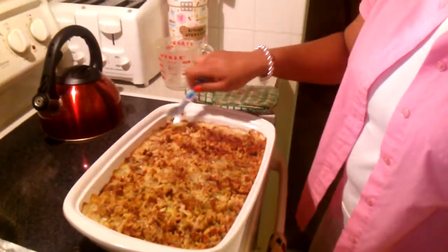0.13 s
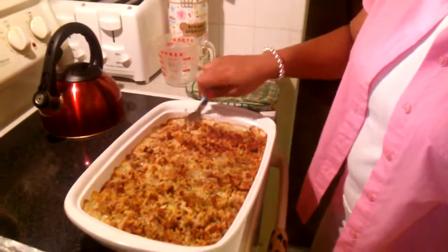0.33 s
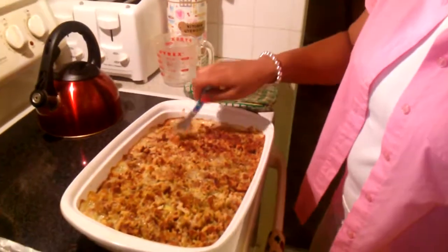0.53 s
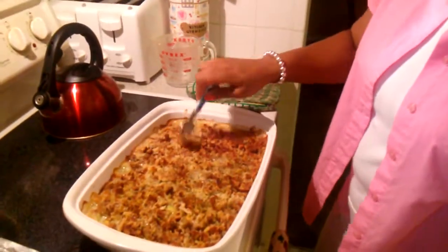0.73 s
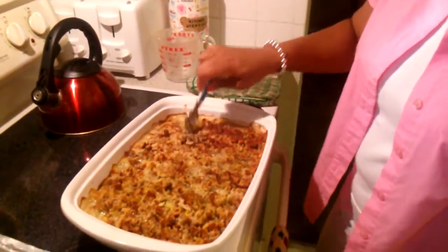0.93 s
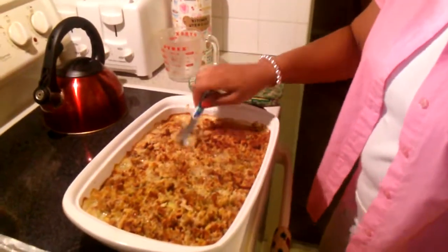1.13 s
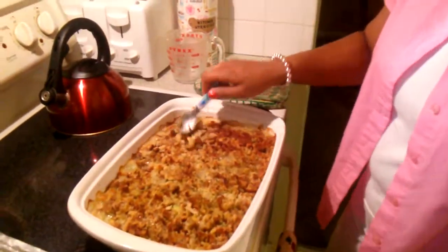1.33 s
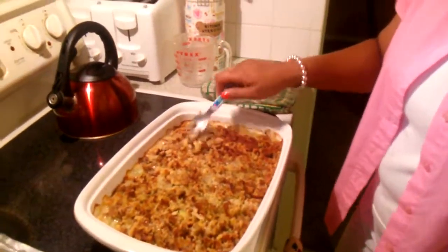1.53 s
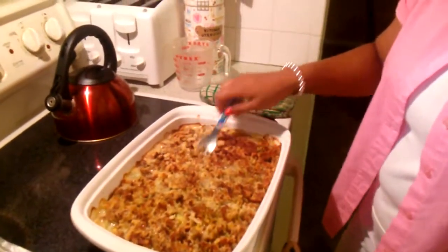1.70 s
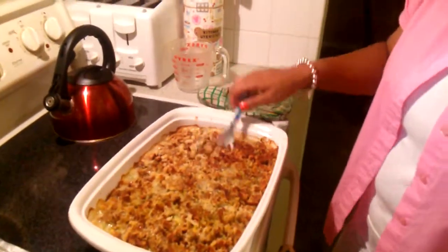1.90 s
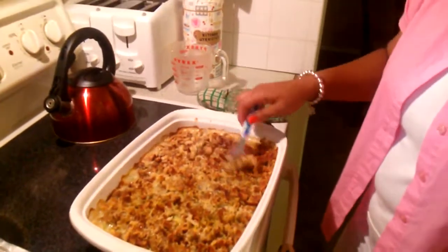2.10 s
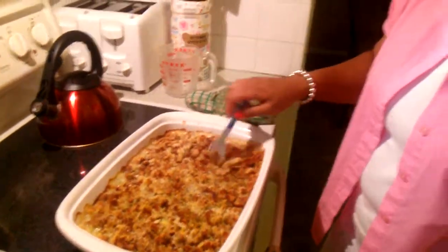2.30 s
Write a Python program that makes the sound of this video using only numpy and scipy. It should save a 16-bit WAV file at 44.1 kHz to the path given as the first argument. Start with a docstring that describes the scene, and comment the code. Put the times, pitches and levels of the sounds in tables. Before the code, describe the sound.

Spoon digging into a crisp baked casserole, one bright dish clink, then crackling scrapes and dull knocks

```python
"""The crisp crust of a hot casserole crackles and snaps under a metal spoon: spectrally shaped random impulses.
The spoon clinks once on the rim of a ceramic dish, a sum of beating modes, then drags as coarse grains;
its dull knocks excite damped resonances, and it squeaks once as a rising tone. Feedback delays give the echo.
Filtered noise makes the room tone, hiss and low rumble; sinusoids make a sagging bump, mains hum and a high whine."""
import sys
import numpy as np
from scipy import signal
from scipy.fft import rfft, irfft, next_fast_len
from scipy.io import wavfile

SR = 44100
rng = np.random.default_rng(int(sys.argv[2]) if len(sys.argv) > 2 else 0)


def transcribe(u):
    """Save the signal u as a 16-bit wav file named by the first command-line argument.

    u: samples, shape (n,) or (channels, n), limited to [-1, 1]; the rate is SR.
    q: integer samples, one column per channel.
    """
    v = np.clip(np.atleast_2d(u).T, -1, 1)
    q = np.round(v * 32767).astype(np.int16)
    wavfile.write(sys.argv[1], SR, q)


N = 103635
T = np.arange(N) / SR   # t/s

# Room tone spectrum, before scaling to unit rms: f/Hz, level per Hz/dB
AIR_SPECTRUM = [(29, -45), (50, -7), (81, -7), (130, -7.5), (162, -0.5), (238, -1.5), (477, -21),
                (628, -11), (688, -17.5), (1660, -27.5), (4000, -29.5), (5200, -51), (8800, -120)]
# Room tone envelope, before the trim: t/s, level/dB
AIR_ENVELOPE = [(0.0, -46), (0.03, -43.5), (0.12, -49.5), (0.2, -43.5), (0.28, -51), (0.38, -45.5),
                (0.46, -46.5), (0.79, -45), (0.83, -41), (0.93, -49), (1.03, -45), (1.28, -49), (1.31, -42),
                (1.37, -47), (1.41, -38.5), (1.58, -47), (1.77, -45.5), (1.8, -50), (1.9, -46.5),
                (1.96, -49), (2.01, -48.5), (2.11, -54.5), (2.13, -49), (2.35, -52)]
AIR_TRIM_DB = -1.5
HISS_DB, HISS_FROM_HZ = -52.5, 4600
# Mains hum partials, before the lift and the swell: f/Hz, level/dB
HUM_PARTIALS = [(120, -53.5), (240, -60.5)]
HUM_LIFT_DB = 3.5
# Whine envelope about which the level throbs: t/s, level/dB
WHINE_ENVELOPE = [(0, -49), (1.25, -49), (1.35, -57), (1.9, -56), (2.1, -61), (2.26, -50), (2.35, -53)]
WHINE_HZ, WHINE_WAVER_DB, WHINE_WAVER_HZ = 15737, 5, 11.6

# Rumble envelope: t/s, level/dB
RUMBLE_ENVELOPE = [(0.0, -54), (0.03, -30), (0.2, -29), (0.27, -48), (0.44, -34.5), (0.5, -55), (0.56, -44),
                   (0.69, -44), (0.76, -30), (0.8, -31), (1.2, -38.5), (1.42, -34.5), (1.45, -42),
                   (1.48, -39), (1.58, -55), (1.62, -33.5), (1.77, -34.5), (2.15, -55), (2.2, -42.5),
                   (2.35, -54)]
RUMBLE_BAND_HZ = (14.1, 46.3)
# A bump through the counter
THUMP_S, THUMP_DB, THUMP_T60_S = .737, -13, .55
THUMP_START_HZ, THUMP_SAG_HZ_PER_S = 37, 30

ROOM_T60_S, ROOM_DB, WALL_CUT_HZ = 0.52, -18.5, 3700

# Spoon dragging in the food, by stretch: t/s, low level/dB, upper level/dB
DRAG_ENVELOPES = [
    [(0.0, -57, -46), (0.008, -63, -48), (0.014, -58, -47.5), (0.064, -71, -55), (0.072, -54, -55.5),
     (0.112, -67, -60), (0.116, -58, -62), (0.128, -66, -57), (0.138, -57, -60), (0.146, -65, -62),
     (0.176, -75, -68), (0.186, -54, -79), (0.2, -46, -53)],
    [(0.42, -58.5, -42.5), (0.428, -47.5, -43), (0.466, -54.5, -49), (0.608, -51.5, -61), (0.652, -47, -47),
     (0.692, -64, -48.5), (0.734, -49.5, -66), (0.752, -68, -68), (0.768, -61, -58), (0.86, -53.5, -44.5),
     (0.92, -71, -53), (1.042, -43, -50), (1.154, -39, -46.5), (1.29, -55, -53.5)],
    [(1.46, -49, -44), (1.496, -61.5, -53), (1.54, -62.5, -44.5), (1.648, -58, -55), (1.672, -53, -59.5),
     (1.696, -60, -51.5), (1.798, -49.5, -50), (1.846, -54, -57.5), (1.988, -56.5, -65),
     (2.012, -44.5, -68), (2.084, -58.5, -61), (2.128, -57, -78), (2.254, -54.5, -52.5), (2.35, -63, -71)],
]
# Low drag spectrum, before scaling to unit rms: f/Hz, level per Hz/dB
DRAG_LOW_SPECTRUM = [(120, -61), (200, -22), (393, 8), (606, -4.5), (680, 3), (763, -2), (1080, -3.5),
                     (1210, -6.5), (2000, -26), (2600, -72), (4400, -120)]
# Upper drag spectrum, before scaling to unit rms: f/Hz, level per Hz/dB
DRAG_UPPER_SPECTRUM = [(1100, -4), (1400, 0), (2200, -1), (3200, 3), (4500, -0.5), (6000, -25)]

# The spoon edge slips
SQUEAK_S, SQUEAK_LENGTH_S, SQUEAK_DB = 1.495, .065, -45
SQUEAK_START_HZ, SQUEAK_RISE_HZ = 3250, 180

# Spoon on the dish under the food:
# t/s, drive level/dB, added high-band level/dB, added low-band level/dB, t60/s
KNOCK_EVENTS = [(1.141, -35, 3, -6, 0.16), (1.302, -17.5, 0.5, -9, 0.19), (1.386, -20, -3.5, 3, 0.1),
                (1.396, -23, -1, 5, 0.12), (1.42, -29.5, -7.5, 12, 0.17), (1.666, -43, -25, -12, .1),
                (1.753, -27.5, -15, -8.5, 0.079), (1.798, -22, -17.5, -15, 0.1),
                (1.866, -29.5, -28, 1, 0.13), (2.006, -27, -13, -13, 0.11)]
# Damped resonances of the full dish: f/Hz, bandwidth/Hz, level/dB
FULL_DISH_MODES = [(131, 95, -2), (209, 115, -1), (324, 55, 0), (414, 69, 2.5), (718, 96, 2.5),
                   (860, 94, -3), (1150, 150, -4), (1350, 155, 2), (1890, 600, -2), (2250, 150, -4.5),
                   (2460, 110, -8.5), (3260, 110, -4.5), (3750, 180, -7), (5300, 1450, -12),
                   (8240, 3500, -16.5)]
KNOCK_DB, KNOCK_SPLIT_HZ = -0.5, (280, 550)

# Spoon on the rim: t/s, gain of the whole clink/dB
CLINK_EVENT = [(0.2239, 1)]
# Beating mode pairs, before the common gain:
# f/Hz, level/dB, t60/s, frequency split/Hz, relative amplitude of the twin (minus = opposed phase)
DISH_MODES = [(790, -11, .15, 30, .5), (1200, -13, .15, 40, .5), (1868, -13, 1.0, 11, .5),
              (2622, -10, .8, 14, -.8), (3460, -5, .9, 9.5, .5), (4208, -2, .35, 6, .5),
              (4468, -8, .7, 44, .8), (5774, -10, .3, 12, .5), (6099, -11, .5, 10, .4),
              (6200, -14, .9, 9, .4), (6438, -14, .4, 15, -.5), (6594, -13, .35, 12, .4),
              (6992, -12, .4, 33, .8), (7085, -12, .5, 12, .5), (8110, -14, .4, 15, .5),
              (9128, -10, .3, 25, .6), (9600, -12, .3, 80, .8), (11095, -18, .35, 12, .4)]
DISH_DB, RING_ROUGH_DB, STRIKE_RISE_S = -18.5, 3.5, .0012
DAMP_S, DAMP_DB_PER_S = 0.36, 246   # the ringing is choked from here on
# Dense small modes of the spoon, before gain or scaling: f/Hz, level/dB
SHIMMER_SPECTRUM = [(500, 7), (800, -25), (2000, -25), (3300, -14), (4400, -9), (5200, -5.5), (6300, 2.5),
                    (7600, -5), (9300, 5.5), (10500, -7.5), (12500, -19), (16000, -23)]
SHIMMER_DB, SHIMMER_SPREAD_DB, SHIMMER_MEAN_T60_S, SHIMMER_FROM_HZ = -29.5, 3, 0.27, 2000
CRACK_DB, CRACK_T60_S = -5, 0.049
# Rough wash between the modes, before scaling to unit rms: f/Hz, level per Hz/dB
RATTLE_SPECTRUM = [(500, -53), (800, -10), (1300, -10.5), (2200, -14), (3300, -3), (4400, 0), (6300, 1),
                   (7600, -0.5), (9300, -0.5), (10500, -6.5), (13000, -16), (16000, -30)]
RATTLE_DB, RATTLE_T60_S = -19, 0.83

# Crust crackling, by stretch of stirring: t/s, level/dB
CRACKLE_ENVELOPE = [
    [(0.0, -34), (0.044, -29.5), (0.064, -42.5), (0.078, -38), (0.122, -44), (0.132, -44), (0.144, -42.5),
     (0.168, -47), (0.178, -40.5), (0.215, -43.5)],
    [(0.4, -37.5), (0.53, -42), (0.538, -41), (0.548, -34.5), (0.588, -41), (0.696, -35.5), (0.778, -46.5),
     (0.832, -35.5), (0.9, -40.5), (0.932, -37), (0.964, -42.5), (1.018, -39.5), (1.16, -37.5),
     (1.232, -47.5), (1.26, -36.5), (1.29, -47)],
    [(1.29, -44), (1.31, -37), (1.368, -43.5), (1.408, -35), (1.498, -40), (1.622, -41.5), (1.676, -45),
     (1.684, -34), (1.786, -33), (1.88, -42), (1.886, -36), (2.038, -42), (2.042, -48), (2.154, -52),
     (2.18, -37.5), (2.35, -46.5)],
]
# Crackle spectrum, before scaling to unit rms: f/Hz, level per Hz/dB
CRUST_SPECTRUM = [(2000, -23.5), (3600, -27.5), (4200, -11.5), (5000, -7.5), (5700, -7.5), (8100, 0.5),
                  (9300, 0.5), (11200, -9.5), (14000, -13), (15700, -12.5), (15900, -26), (16400, -26)]
MEDIAN_GRAINS_PER_S, GRAIN_SPREAD_DB, CLUMP_DB = 5000, 1.5, 2
# Crumbs breaking: t/s, tick level/dB, then low, middle and high band level/dB before the burst gain
SNAP_EVENTS = [(0.0258, -25, -37, -30, -39), (0.0414, -24, -30, -35, -45), (0.0764, -39, -46, -42, -42),
               (0.1762, -31, -52, -34, -53), (0.18, -39, -59, -38, -45), (0.5477, -29, -41, -37, -40),
               (0.559, -24.5, -33.5, -24, -48), (0.621, -21, -37, -23, -42), (0.6944, -12, -48, -37, -39),
               (0.8292, -27.5, -40, -25, -41), (0.924, -30, -43, -36, -50), (1.0111, -35, -47, -35, -48),
               (1.0338, -27, -45, -26.5, -48), (1.2603, -24, -28.5, -46, -46), (1.6054, -30, -42, -29, -38),
               (1.6113, -22, -29.5, -21.5, -32), (1.6858, -23, -39, -27, -43), (1.69, -31, -41, -29, -40),
               (1.7442, -24, -26, -28, -38), (1.8871, -4, -21, -24, -46), (1.976, -26, -29.5, -37, -44.5),
               (2, -25, -38, -32.5, -27.5), (2.056, -36, -50, -33, -54), (2.1455, -44, -44, -39, -56),
               (2.18, -26, -42, -26, -46)]
# Pass bands of the snaps: lower f/Hz, upper f/Hz
SNAP_BANDS = [(4100, 5200), (6500, 8500), (10500, 14600)]
SNAP_BURST_GAIN_DB, SNAP_BURST_T60_S = 9, .014

CUTOFF_HZ = 15790


def from_db(db):
    """Amplitude ratio: twenty decibels to a factor of ten."""
    return 10 ** (np.asarray(db) / 20)


def rms_one(x):
    """Normalization to unit root mean square."""
    return x / np.sqrt(np.mean(x ** 2) + 1e-20)


def in_time(rows):
    """Linear interpolation of every column over time."""
    s, *columns = np.transpose(rows)
    return [np.interp(T, s, c) for c in columns]


def drift(rate_hz):
    """Random fluctuation: white noise through a double real pole, scaled to unit rms."""
    r = np.exp(-2 * np.pi * rate_hz / SR)
    noise = rng.standard_normal(N + SR)
    settled = signal.lfilter([1], [1, -2 * r, r * r], noise)[SR:]
    return rms_one(settled)


def colour(x, spectrum):
    """Spectral shaping on a log-frequency axis, at -80 dB outside the table, to unit rms."""
    hz, db = np.transpose(spectrum)
    f = np.maximum(np.arange(N // 2 + 1) * SR / N, 1)
    gain = from_db(np.interp(np.log(f), np.log(hz), db, -80, -80))
    return rms_one(irfft(rfft(x) * gain, N))


def dying(s, t60):
    """Exponential decay: zero until s, then 60 dB of fall from 1 in every t60."""
    return (T >= s) * from_db(-60 * np.maximum(T - s, 0) / t60)


def grains(per_s, spread_db):
    """Random impulse process: clicks of uneven size and random sign."""
    sizes = from_db(spread_db * np.minimum(rng.exponential(1, N), 5))
    signs = rng.choice([-1, 1], N)
    return sizes * signs * (rng.random(N) < per_s / SR)


def room_tone(air_db):
    """Broadband noise: a fixed spectrum under a changing level."""
    return from_db(AIR_TRIM_DB + air_db) * colour(rng.standard_normal(N), AIR_SPECTRUM)


def hiss():
    """Stationary noise with its energy in the treble."""
    spectrum = [(HISS_FROM_HZ / 2, -20), (HISS_FROM_HZ, 0), (15800, 0)]
    return from_db(HISS_DB) * colour(rng.standard_normal(N), spectrum)


def hum(air_db):
    """Harmonic superposition of mains partials, swelling with the room tone."""
    swell = from_db(air_db - air_db.mean())
    partials = sum(from_db(db + HUM_LIFT_DB) * np.sin(2 * np.pi * hz * T) for hz, db in HUM_PARTIALS)
    return partials * swell


def whine():
    """Amplitude modulation: a high sinusoid whose level throbs periodically in decibels."""
    level_db, = in_time(WHINE_ENVELOPE)
    waver_db = WHINE_WAVER_DB * np.cos(2 * np.pi * WHINE_WAVER_HZ * T)
    return from_db(level_db + waver_db) * np.sin(2 * np.pi * WHINE_HZ * T)


def background():
    """Superposition of room tone, hum, whine and hiss."""
    air_db, = in_time(AIR_ENVELOPE)
    return room_tone(air_db) + hum(air_db) + whine() + hiss()


def rumble():
    """Band-limited noise near the lower limit of hearing, uneven in level."""
    level_db, = in_time(RUMBLE_ENVELOPE)
    band = signal.butter(3, RUMBLE_BAND_HZ, "band", fs=SR, output="sos")
    noise = signal.sosfilt(band, rng.standard_normal(N + SR))[SR:]   # drop the filter's onset
    return from_db(level_db) * rms_one(noise)


def bump():
    """Damped oscillation whose frequency falls linearly with time."""
    t = T - THUMP_S
    cycles = THUMP_START_HZ * t - THUMP_SAG_HZ_PER_S * t ** 2 / 2
    return from_db(THUMP_DB) * np.sin(2 * np.pi * cycles) * dying(THUMP_S, THUMP_T60_S)


def kitchen(x):
    """Reverberation: eight feedback delays, each low-passed on every round."""
    size = next_fast_len(N + SR)
    w = 2 * np.pi * np.arange(size // 2 + 1) / size
    dull = 1 / (1 + 1j * w * SR / (2 * np.pi * WALL_CUT_HZ))
    echo = 0
    for k, lag in enumerate(rng.uniform(.008, .03, 8)):   # lag in s
        loop = from_db(-60 * lag / ROOM_T60_S) * dull * np.exp(-1j * w * lag * SR)
        echo = echo + (-1) ** k * loop / (1 - loop)
    return irfft(rfft(x, size) * echo, size)[:N]


def drag():
    """Friction as a train of coarse random impulses, shaped in two bands for the spoon in the food."""
    low_db, upper_db = in_time(np.concatenate(DRAG_ENVELOPES))
    low = from_db(low_db) * colour(grains(1500, 2.2), DRAG_LOW_SPECTRUM)
    upper = from_db(upper_db) * colour(grains(3000, 1.47), DRAG_UPPER_SPECTRUM)
    return low + upper


def squeak():
    """Frequency modulation: a faint tone that rises with random wavering."""
    part = np.clip((T - SQUEAK_S) / SQUEAK_LENGTH_S, 0, 1)
    hz = SQUEAK_START_HZ + SQUEAK_RISE_HZ * part + 30 * drift(76)
    swell = np.sin(np.pi * part)
    return from_db(SQUEAK_DB) * swell * np.sin(2 * np.pi * np.cumsum(hz) / SR)


def knock_envelope(band):
    """Superposed decays of all knocks, in the low (0), middle (1) or high (2) band."""
    total = 0
    for s, db, bright_db, depth_db, t60 in KNOCK_EVENTS:
        band_db = (depth_db, 0, bright_db)[band]
        total = total + from_db(db + band_db) * dying(s, t60)
    return total


def knocks():
    """Forced resonance: dying bursts of lumpy contacts drive the damped modes of the full dish."""
    envelopes = [knock_envelope(band) for band in range(3)]
    contact = rms_one(grains(3000, 2.5))
    out = 0
    for k, (hz, width, db) in enumerate(FULL_DISH_MODES):
        band = np.searchsorted(KNOCK_SPLIT_HZ, hz)
        drive = envelopes[band] * contact * from_db(2.0 * drift(22.4))
        r = np.exp(-np.pi * width / SR)   # pole radius from the bandwidth
        poles = [1, -2 * r * np.cos(2 * np.pi * hz / SR), r * r]
        mode = signal.lfilter([1 - r * r, 0, r * r - 1], poles, drive + 1e-18)
        out = out + (-1) ** k * from_db(db) * mode
    return from_db(KNOCK_DB) * out


def dish_ring(s):
    """Beating: each mode and its detuned twin interfere, while their level flutters at random."""
    t, out = T - s, 0
    for hz, level_db, t60, split_hz, twin in DISH_MODES:
        pair = np.sin(2 * np.pi * hz * t) + twin * np.sin(2 * np.pi * (hz + split_hz) * t)
        flutter_db = RING_ROUGH_DB * drift(34)
        out = out + from_db(DISH_DB + level_db + flutter_db) * dying(s, t60) * pair
    return out


def spoon_shimmer(s):
    """Modal density: 160 small decaying modes at random frequencies."""
    t, out = T - s, 0
    shape_hz, shape_db = np.transpose(SHIMMER_SPECTRUM)
    for place, size, life, turn in rng.random((160, 4)):
        hz = SHIMMER_FROM_HZ + place * (shape_hz[-1] - SHIMMER_FROM_HZ)
        mode_db = np.interp(np.log(hz), np.log(shape_hz), shape_db)
        level_db = SHIMMER_DB + mode_db + SHIMMER_SPREAD_DB * (2 * size - 1)
        decay = dying(s, SHIMMER_MEAN_T60_S * (.5 + life))
        out = out + from_db(level_db) * decay * np.sin(2 * np.pi * (hz * t + turn))
    return out


def clink():
    """Impact excitation: ringing modes, shimmer, a short noise crack and a rough wash, soon choked."""
    s, db = CLINK_EVENT[0]
    crack = colour(rng.standard_normal(N), SHIMMER_SPECTRUM) * from_db(CRACK_DB) * dying(s, CRACK_T60_S)
    rattle = colour(grains(6000, 2.6), RATTLE_SPECTRUM) * from_db(RATTLE_DB) * dying(s, RATTLE_T60_S)
    rise = np.clip((T - s) / STRIKE_RISE_S, 0, 1) ** 2
    choke = from_db(db - DAMP_DB_PER_S * np.maximum(T - DAMP_S, 0))
    return (dish_ring(s) + spoon_shimmer(s) + crack + rattle) * rise * choke


def crackle():
    """Clustered fracture: fine random impulses whose density fluctuates, with a shaped spectrum."""
    level_db, = in_time(np.concatenate(CRACKLE_ENVELOPE))
    grains_per_s = MEDIAN_GRAINS_PER_S * from_db(CLUMP_DB * drift(40))
    return from_db(level_db) * colour(grains(grains_per_s, GRAIN_SPREAD_DB), CRUST_SPECTRUM)


def snaps():
    """Brittle fracture: each crumb gives an impulse and a short burst of grains, balanced over three bands."""
    spray = rms_one(grains(4400, 4.2))
    out = 0
    for k, band_hz in enumerate(SNAP_BANDS):
        drive = np.zeros(N)
        for s, tick_db, *band_db in SNAP_EVENTS:
            drive += from_db(SNAP_BURST_GAIN_DB + band_db[k]) * dying(s, SNAP_BURST_T60_S) * spray
            drive[int(s * SR)] += from_db(tick_db + band_db[k] - max(band_db))
        band = signal.butter(2, band_hz, "band", fs=SR, output="sos")
        out = out + signal.sosfilt(band, drive + 1e-18)
    return out


def crust():
    """Superposition of the fine crackle and the single snaps."""
    return crackle() + snaps()


def scene():
    """Superposition of all sources; only crust, knocks and squeak excite the reverberation."""
    near = crust() + knocks() + squeak()
    echo = from_db(ROOM_DB) * kitchen(near)
    mix = near + echo + clink() + drag() + rumble() + bump() + background()
    return mix[None]


def record(dry):
    """Amplitude limiting by hard clipping, then a steep elliptic low-pass."""
    clipped = np.clip(dry, -.97, .97)
    low_pass = signal.ellip(12, .5, 70, CUTOFF_HZ, fs=SR, output="sos")
    return signal.sosfilt(low_pass, clipped)


dry = scene()
out = record(dry)
transcribe(out)
```